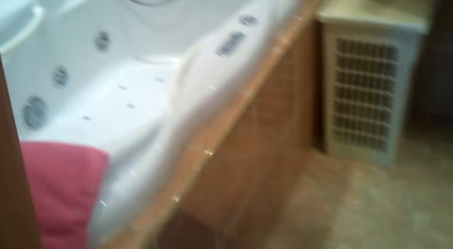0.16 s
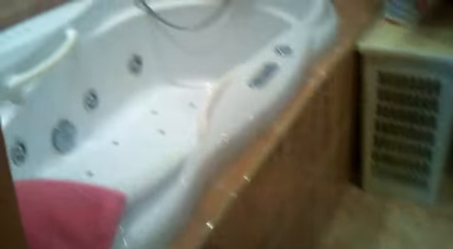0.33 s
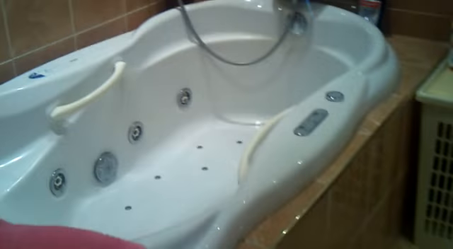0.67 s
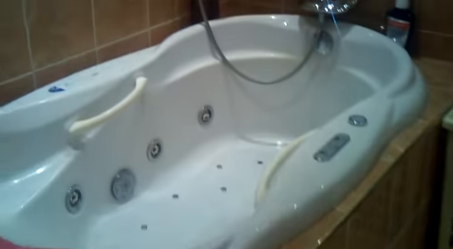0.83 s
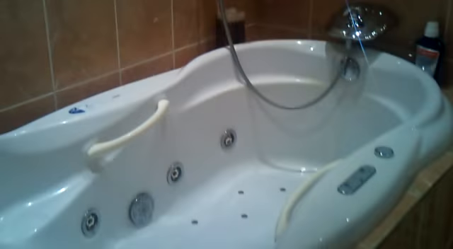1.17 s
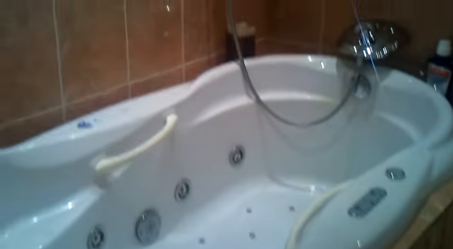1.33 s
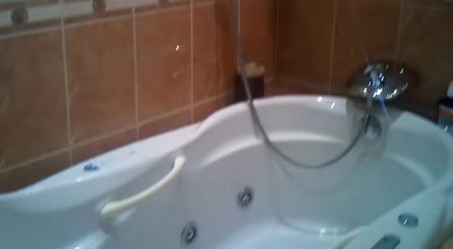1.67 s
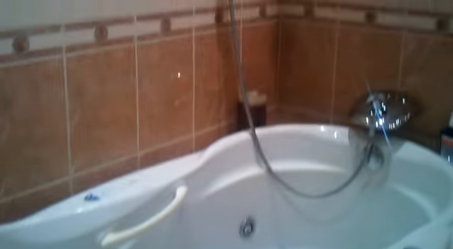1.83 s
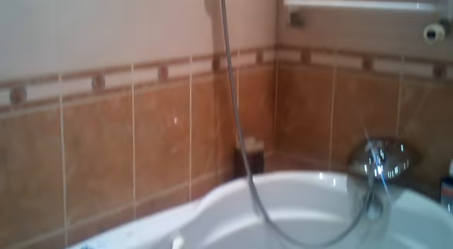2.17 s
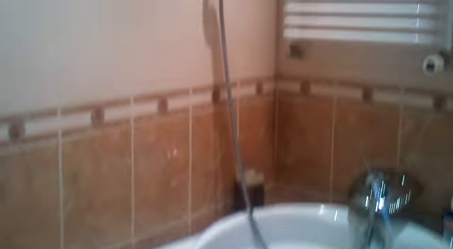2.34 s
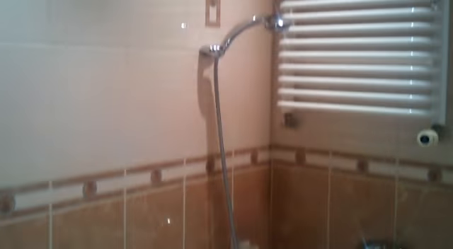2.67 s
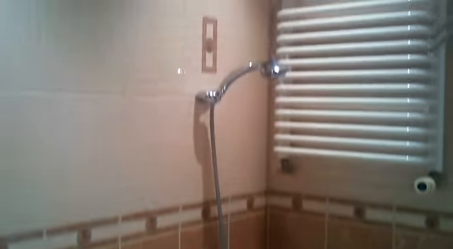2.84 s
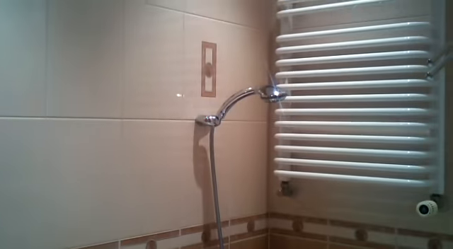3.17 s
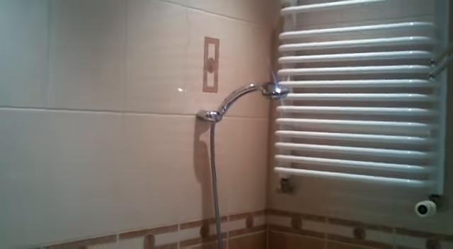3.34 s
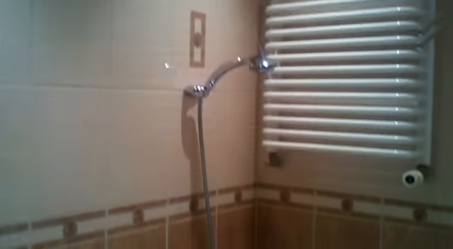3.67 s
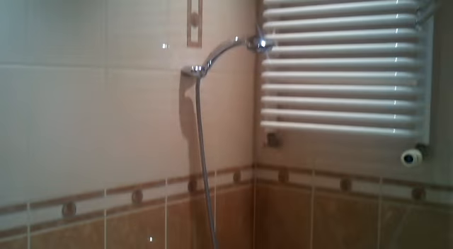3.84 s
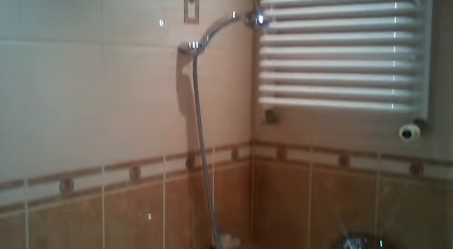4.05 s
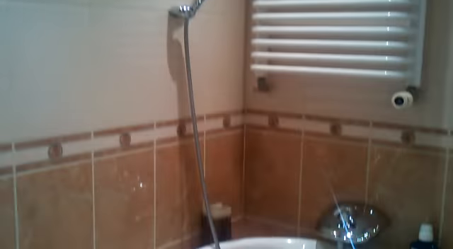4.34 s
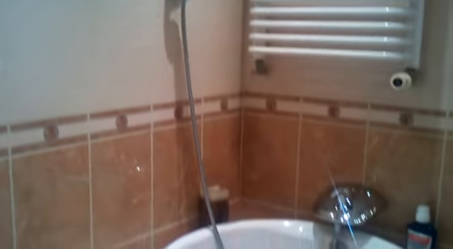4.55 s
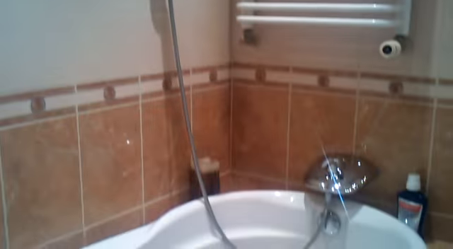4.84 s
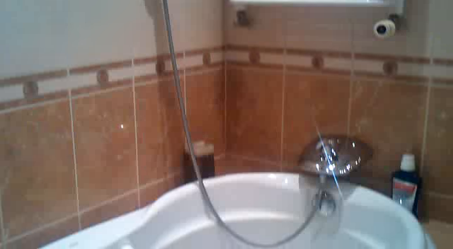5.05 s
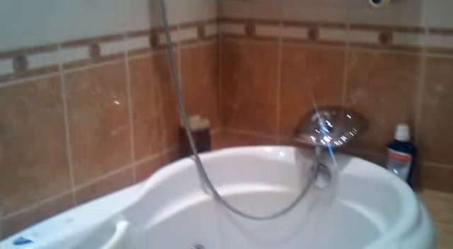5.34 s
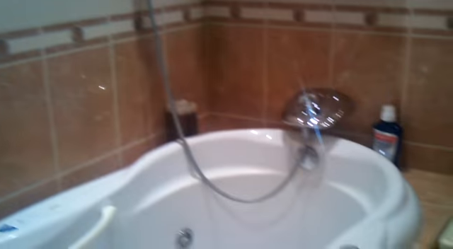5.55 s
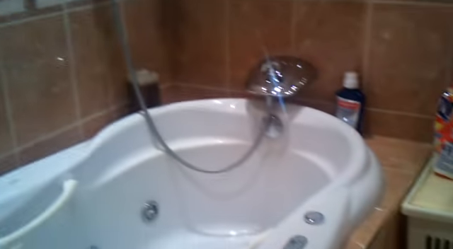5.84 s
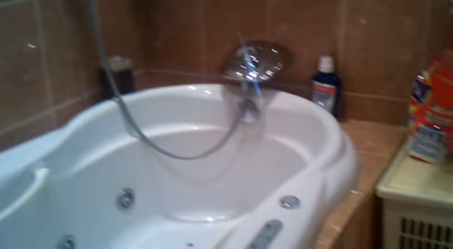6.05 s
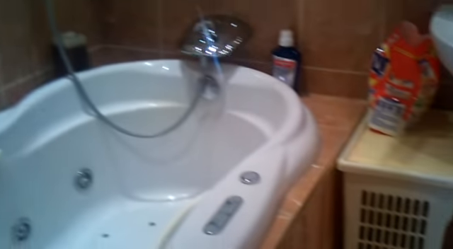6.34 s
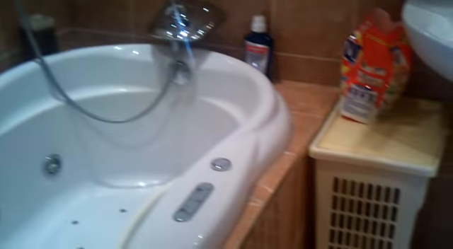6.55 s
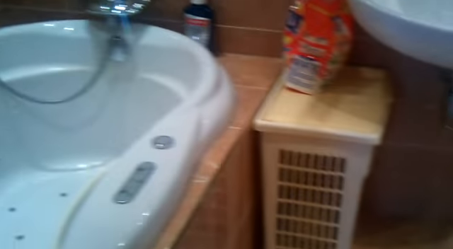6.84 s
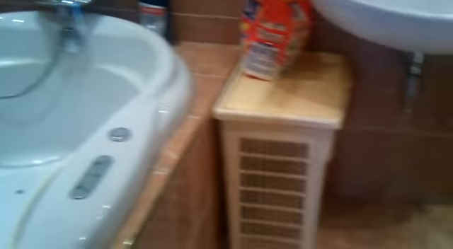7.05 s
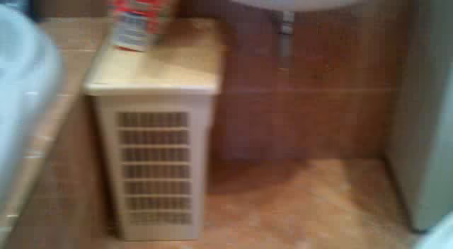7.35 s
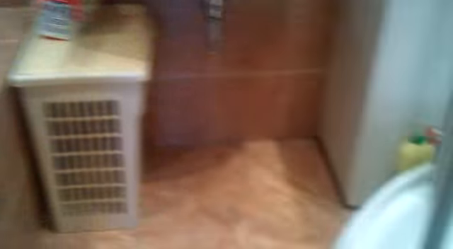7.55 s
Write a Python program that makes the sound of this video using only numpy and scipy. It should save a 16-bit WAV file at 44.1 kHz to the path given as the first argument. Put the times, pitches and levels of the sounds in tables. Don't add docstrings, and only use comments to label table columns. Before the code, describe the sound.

In a quiet tiled bathroom, a low electrical hum and thin fan whine continue while a hand rubs and creaks a plastic casing close up.

```python
import sys
import numpy as np
from scipy import signal
from scipy.io import wavfile
from scipy.ndimage import uniform_filter1d

SR = 44100
rng = np.random.default_rng(int(sys.argv[2]) if len(sys.argv) > 2 else 0)


def linear_from_db(decibels):
    return 10 ** (np.asarray(decibels, float) / 20)


def generate_wav(sig):
    pcm = np.round(np.clip(np.atleast_2d(sig).T, -1, 1) * 32767).astype(np.int16)
    wavfile.write(sys.argv[1], SR, pcm)


N = 340083


def evened(x):
    return x / np.sqrt(np.mean(x ** 2) + 1e-20)


def add(mix, start_s, sound):
    part = mix[round(start_s * SR):][:len(sound)]
    part += sound[:len(part)]


def along(rows, axis):
    rows = np.array(rows)
    return np.interp(np.arange(N) / SR, rows[:, 0], rows[:, axis], -120, -120)


def wander(top_hz):
    t = np.arange(N) / SR
    rates_hz = np.geomspace(top_hz / 20, top_hz, 12)
    return evened(sum(np.sin(2 * np.pi * (hz * t + rng.random())) / np.sqrt(hz) for hz in rates_hz))


def noise(colour, patchy_db, flicker_db):
    frames = N // 256 + 5
    bin_hz = np.fft.rfftfreq(1024, 1 / SR)
    real, imaginary, patches = rng.standard_normal((frames, 513, 3)).T
    flicker = evened(uniform_filter1d(patches[0], size=3))
    patches = uniform_filter1d(patches, size=12, axis=0)
    patches = evened(uniform_filter1d(patches, size=12, axis=1))
    hz, db = np.transpose(colour)
    colour_db = np.interp(np.log(bin_hz + 1), np.log(hz + 1), db)[:, None]
    level_db = colour_db + patchy_db * patches + flicker_db * flicker
    spectra = (real + 1j * imaginary) * linear_from_db(level_db)
    return evened(signal.istft(spectra, nperseg=1024, noverlap=768)[1][:N])


# pitch_hz, level_db (per Hz)
AIR_COLOUR = [(14, -17), (42, 4), (70, -10), (140, -1), (300, -9.5), (640, -12), (1000, -16), (2200, -20.5),
              (3400, -25.5), (5600, -30), (11500, -33.5), (13300, -32), (14100, -40), (14200, -93)]


def air():
    return linear_from_db(-44.5) * noise(AIR_COLOUR, patchy_db=0.74, flicker_db=0.6)


# pitch_hz, level_db (rms)
HUM_PARTIALS = [(50.1, -53.5), (100.2, -39.5), (140.5, -58.5), (200.4, -59)]


def mains():
    t = np.arange(N) / SR
    hum = np.zeros(N)
    for pitch_hz, level_db in HUM_PARTIALS:
        level = linear_from_db(level_db + 0.75 * wander(11)) * np.sqrt(2)
        hum += level * np.sin(2 * np.pi * (pitch_hz * t + rng.random()))
    return hum


# time_s, blade_db, octave_db
FAN_LEVELS = [(0.0, -48, -60.5), (0.52, -48.5, -57.5), (1.0, -51, -55), (1.8, -50, -54), (2.1, -49, -53),
              (2.8, -46.5, -60.5), (3.26, -45, -60), (3.58, -45.5, -53.5), (3.95, -46, -58),
              (4.23, -44.5, -52.5), (4.64, -46.5, -55.5), (5.4, -48, -50.5), (5.88, -48, -56),
              (6.25, -47.5, -52), (6.45, -51.5, -54.5), (6.89, -46, -58), (7.15, -49.5, -56),
              (7.71, -51.5, -57.5)]


def fan():
    turns = np.cumsum(362 * (1 + 0.00087 * wander(3.7))) / SR
    blade = linear_from_db(along(FAN_LEVELS, axis=1) + 1.0 * wander(8)) * np.sin(2 * np.pi * turns)
    octave = linear_from_db(along(FAN_LEVELS, axis=2) + 1.3 * wander(8)) * np.sin(4 * np.pi * turns)
    return np.sqrt(2) * (blade + octave)


# pitch_hz, level_db (per Hz)
LOW_RUB_COLOUR = [(90, -24), (180, 0), (270, 0.5), (380, -1), (550, -9), (1000, -13), (2000, -42)]
# pitch_hz, level_db (per Hz)
SKIN_HISS_COLOUR = [(500, -7.5), (1200, -3.5), (2500, -1.5), (3600, -6.5), (5000, -5.5), (6500, -14),
                    (10000, -19), (13500, -39), (14200, -80)]
# start_s, length_s, level_db
FINGER_DRAGS = [
    (6.837, 0.1, -45.5),
    (7.038, 0.063, -55.5),
    (7.131, 0.029, -43.5),
    (7.18, 0.055, -79),
    (7.458, 0.033, -48.5),
    (7.653, 0.021, -54),
]
# start_s, length_s, low_rub_db, skin_hiss_db
HAND_STROKES = [
    (0.0, 0.25, -61, -54),
    (0.274, 0.28, -45, -56.5),
    (0.474, 0.82, -61, -55),
    (1.7, 1.01, -74, -56.5),
    (2.3, 0.42, -65, -77),
    (6.86, 0.46, -44.5, -51),
    (7.22, 0.26, -46.5, -52.5),
    (7.42, 0.36, -43, -54.5),
]


def rub():
    low = noise(LOW_RUB_COLOUR, patchy_db=1.5, flicker_db=5.0)
    hiss = noise(SKIN_HISS_COLOUR, patchy_db=2.0, flicker_db=1.5)
    drags, press_power, slide_power = np.zeros((3, N))
    for start_s, length_s, level_db in FINGER_DRAGS:
        add(drags, start_s, linear_from_db(level_db) * signal.windows.tukey(round(length_s * SR), 0.6))
    for start_s, length_s, low_db, hiss_db in HAND_STROKES:
        swell = signal.windows.tukey(round(length_s * SR), 0.51) ** 2
        add(press_power, start_s, linear_from_db(2 * low_db) * swell)
        add(slide_power, start_s, linear_from_db(2 * hiss_db) * swell)
    return drags * (hiss + low) + np.sqrt(press_power) * low + np.sqrt(slide_power) * hiss


def unit(x):
    return x / np.linalg.norm(x)


def causal(gain):
    log_gain = np.log(np.r_[gain, gain[-2:0:-1]] + 1e-7)
    return np.fft.ifft(np.exp(np.conj(signal.hilbert(log_gain)))).real[:700]


# pitch_hz, width_hz, level_db
CASE_MODES = [
    [(288, 240, -2), (370, 290, -1)],
    [(870, 650, 1.5), (1550, 820, -4)],
    [(2820, 2300, 1.5), (3980, 1200, -3)],
    [(5250, 1500, 0)],
    [(7000, 2100, 3.5), (9400, 1700, -8)],
]


def stress(thump_db, crack_db, crack_hz, fall_db):
    octaves = np.log2([modes[0][0] / crack_hz for modes in CASE_MODES[1:]])
    return (thump_db, *(crack_db - abs(fall_db) * octaves ** 2))


def creak(group_db, luck):
    t = np.arange(100) / SR
    f = np.fft.rfftfreq(2048, 1 / SR)
    grit = (luck[5:] - luck[:-5]) * np.exp(-t / 0.0007)
    jolt = (t == 0) * np.sign(luck[0]) + 0.1 * (t > 0) * grit
    power = 0
    for modes, energy_db, chance in zip(CASE_MODES, group_db, luck):
        spot = np.exp(0.025 * chance)
        ring = 0
        for pitch_hz, width_hz, level_db in modes:
            detune = (f ** 2 - (pitch_hz * spot) ** 2) / (width_hz * f + 1)
            ring = ring + linear_from_db(2 * level_db) / (1 + detune ** 2) ** 2
        power = power + linear_from_db(2 * energy_db) * ring / ring.mean()
    return np.convolve(jolt, causal(np.sqrt(power)))


# peak_s, thump_db, knock_db (energies)
DULL_CREAKS = [(0.0698, -18, -24), (0.1017, -10, -22), (0.3648, -5, -16), (0.382, -11, -32),
               (0.411, -14, -29), (0.434, -16, -38), (0.4578, -9, -40), (0.4696, -18, -38),
               (1.486, -8, -14.5), (1.505, -5.5, -21), (1.53, -10.5, -15.5), (1.561, -10, -21),
               (1.6094, -10, -18), (2.354, -4.5, -23), (2.4139, -8, -20.5), (2.438, -14, -37),
               (2.4833, -26, -40), (4.4534, -26, -38), (4.4817, -9, -23), (5.5724, -17, -39),
               (6.9458, -8.5, -19), (7.0809, -9.5, -42), (7.3143, -15, -40), (7.37, -15, -30),
               (1.441, -15, -14), (7.6031, -7, -35), (7.658, -6, -21)]
# peak_s, thump_db, crack_db (energies), crack_hz, fall_db (one octave off)
SHARP_SNAPS = [(0.0205, -11, -13, 1620, 9), (0.2342, -7, -14, 1770, 6), (0.489, -10, -14, 1480, 10.5),
               (1.1513, -28, -17.5, 1390, 12), (7.5294, -6.5, -14, 1200, 8), (1.444, -7, -12, 1940, 5.5),
               (1.5187, -21, -14, 2600, 12.5), (2.0513, -14, -4, 1910, 3.5), (4.1356, -20, -27, 7000, 10),
               (4.3284, -33, -16, 3300, 18), (5.4242, -5.5, -10, 1670, 4), (6.3974, -26, -29, 5770, 15),
               (6.8779, -9, -6.5, 3300, 1), (6.9159, 8, -3, 4200, -0.5), (7.2247, -21, -12.5, 1290, 10.5),
               (7.4687, -10, -18, 1490, 4), (7.4832, -30, -36, 1700, 3.5), (7.494, -28, -31, 2800, 5),
               (7.5113, -7.5, -16, 1390, 4), (7.55, -8.5, -9.5, 1720, 5.5), (7.5792, -2, -16, 1280, 2),
               (7.6197, -10, -27, 2500, 3), (7.642, -22, -13.5, 1100, 6), (7.665, -10, -14.5, 1480, 6.5)]


def case():
    dull_hz, dull_fall_db = 800, 7
    lead_s = 0.00023
    slips = list(SHARP_SNAPS) + [(*row, dull_hz, dull_fall_db) for row in DULL_CREAKS]
    mix = np.zeros(N)
    for (peak_s, *force), luck in zip(slips, rng.standard_normal((len(slips), 105))):
        add(mix, peak_s - lead_s, creak(stress(*force), luck))
    return mix


def scene():
    room = mains() + fan() + air()
    return (room + rub() + case())[None]


def roll_off(x):
    return signal.sosfilt(signal.butter(12, 15170, fs=SR, output="sos"), x)


def record(dry):
    power = uniform_filter1d(dry[0] ** 2, size=88, origin=43)
    power_db = 10 * np.log10(abs(power) + 1e-12)
    recovery_db = np.arange(N) * 60.0 / SR
    held_db = np.maximum.accumulate(power_db + recovery_db) - recovery_db
    over_db = np.maximum(held_db + 21.5, 0)
    ducked = dry / linear_from_db(0.87 * uniform_filter1d(over_db, size=400, origin=199))
    ducked = 0.8 * np.tanh(ducked / 0.8)
    low_pass = signal.firwin(255, 14180, window=("kaiser", 7), fs=SR)
    band = signal.oaconvolve(ducked, low_pass[None], "same")
    return roll_off(band)


dry = scene()
out = record(dry)
generate_wav(out)
```